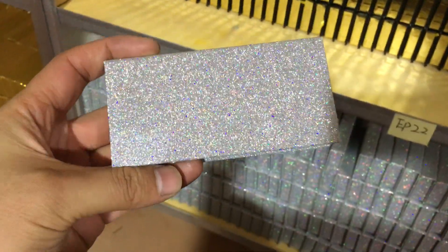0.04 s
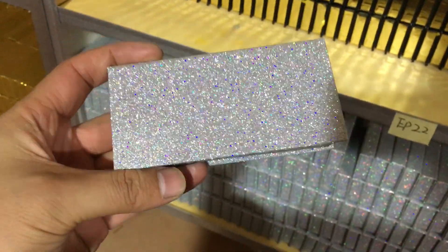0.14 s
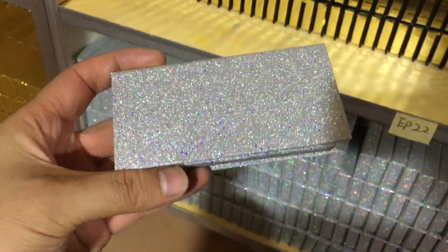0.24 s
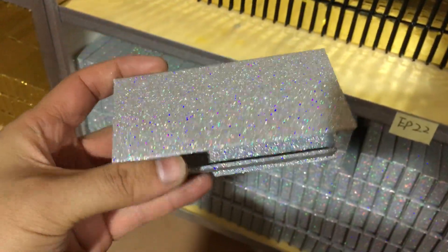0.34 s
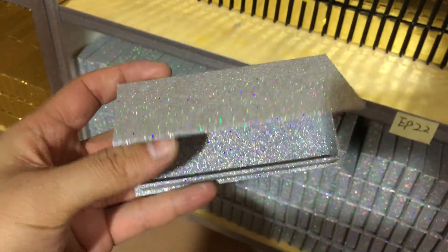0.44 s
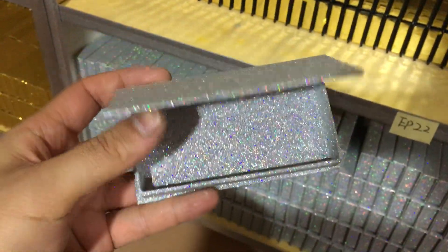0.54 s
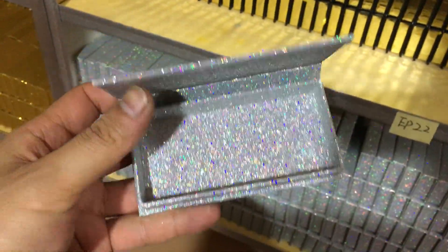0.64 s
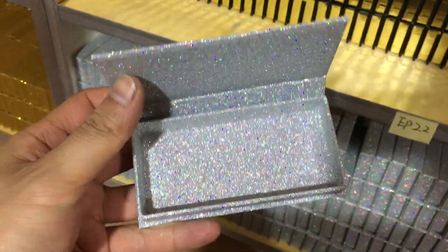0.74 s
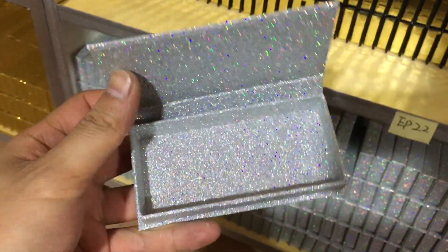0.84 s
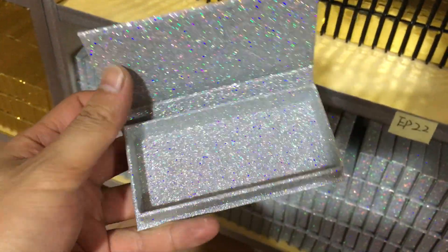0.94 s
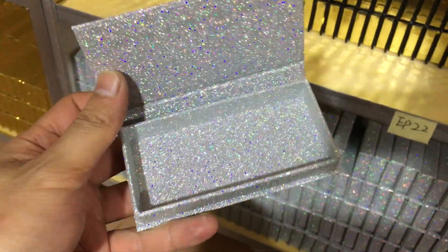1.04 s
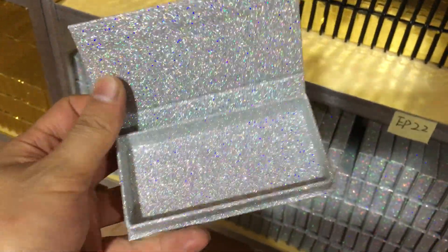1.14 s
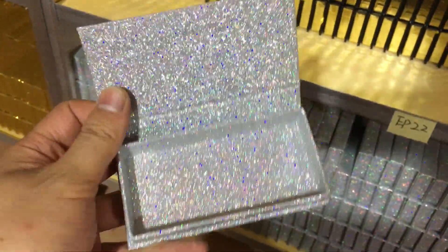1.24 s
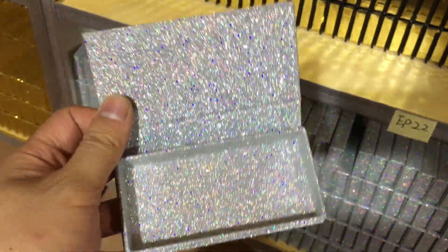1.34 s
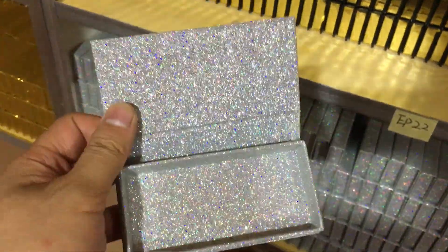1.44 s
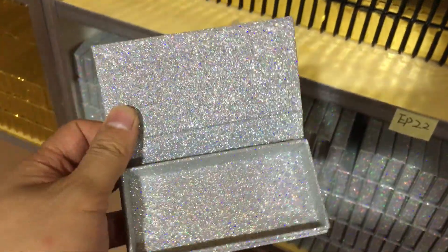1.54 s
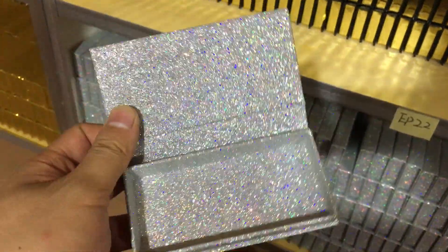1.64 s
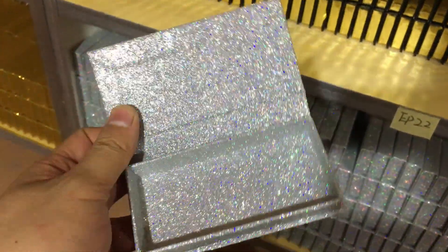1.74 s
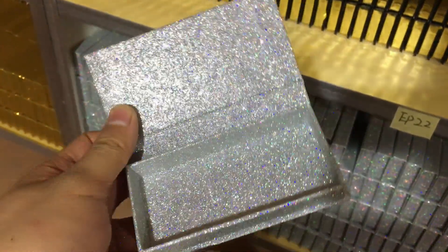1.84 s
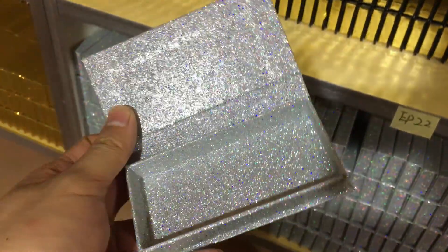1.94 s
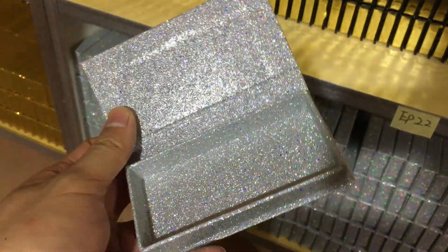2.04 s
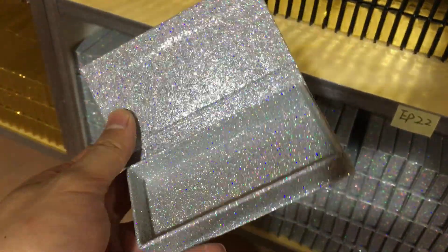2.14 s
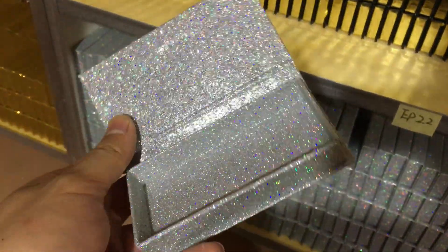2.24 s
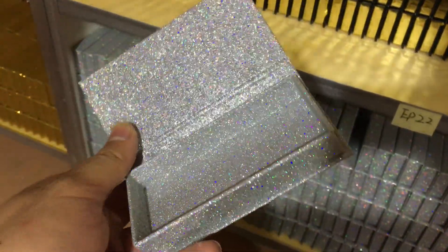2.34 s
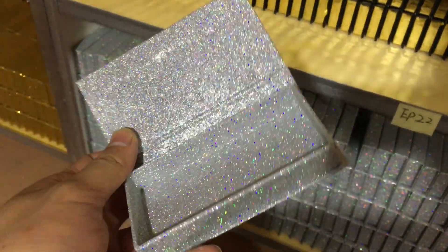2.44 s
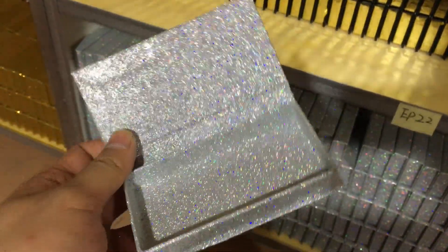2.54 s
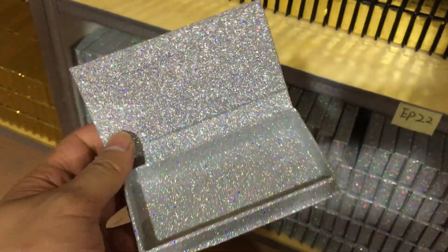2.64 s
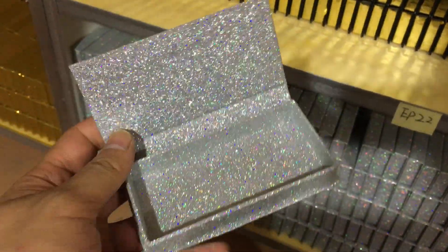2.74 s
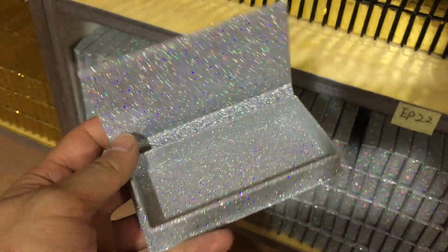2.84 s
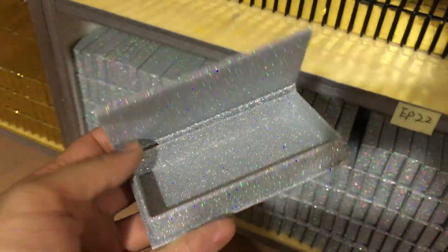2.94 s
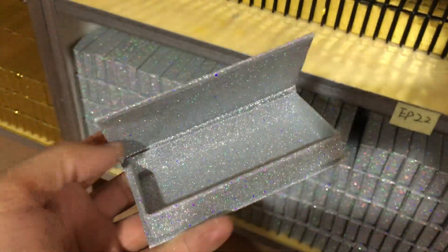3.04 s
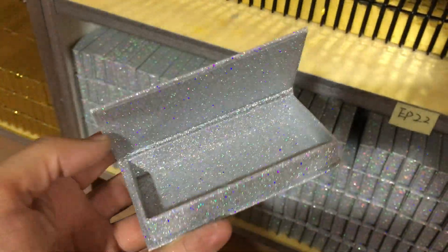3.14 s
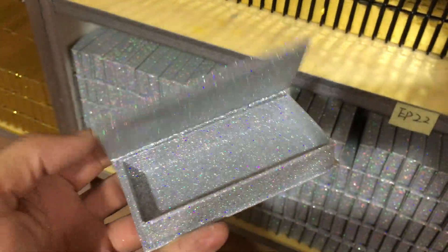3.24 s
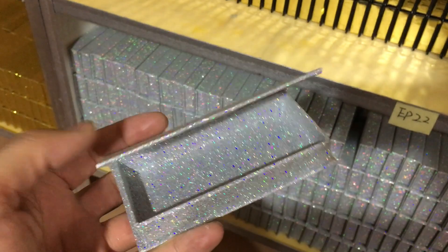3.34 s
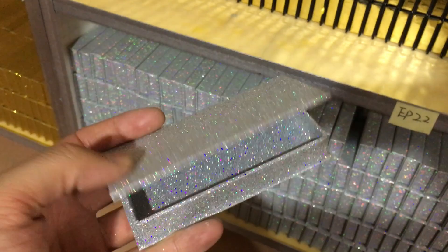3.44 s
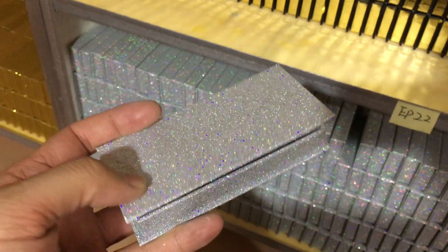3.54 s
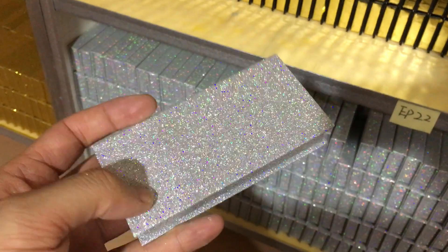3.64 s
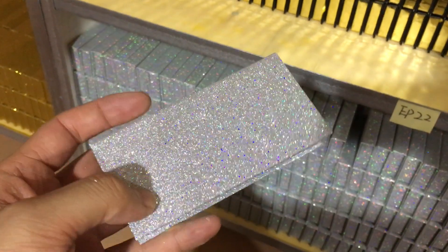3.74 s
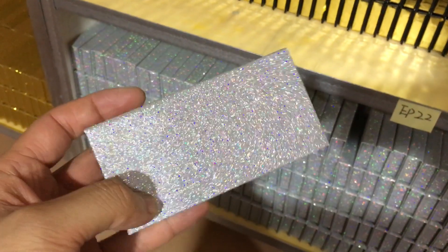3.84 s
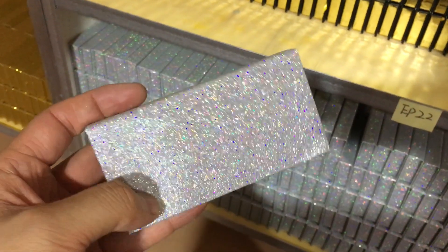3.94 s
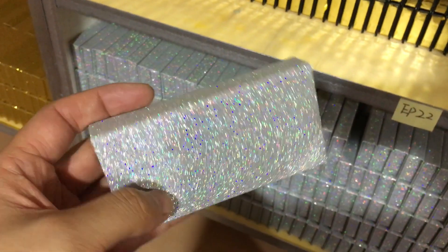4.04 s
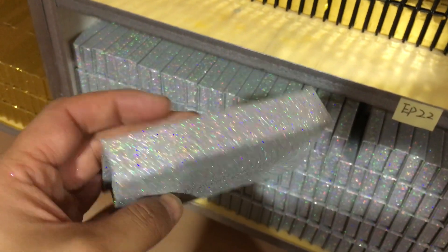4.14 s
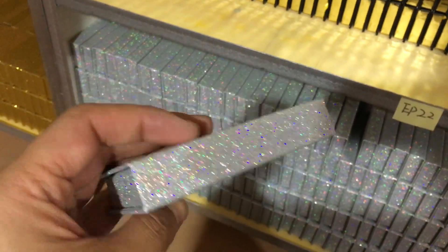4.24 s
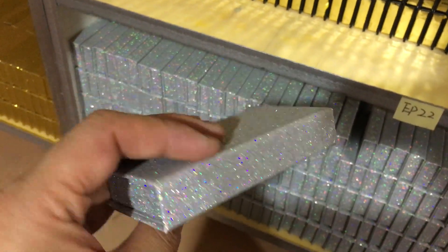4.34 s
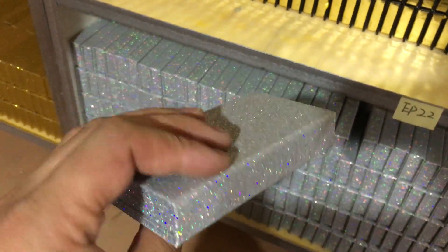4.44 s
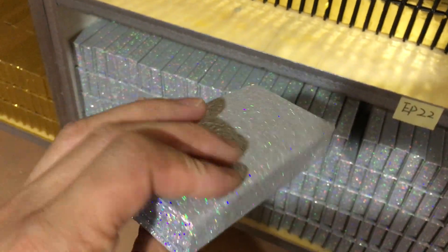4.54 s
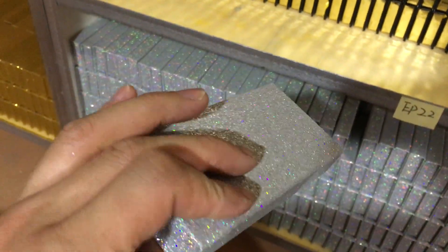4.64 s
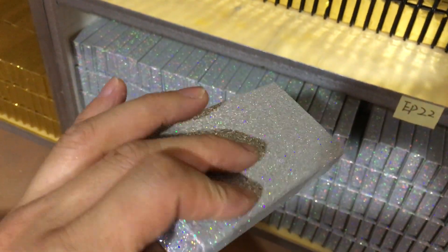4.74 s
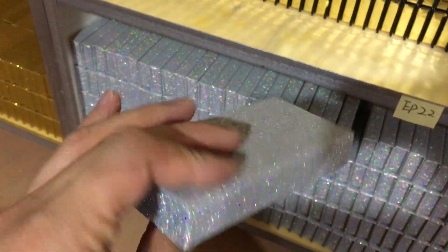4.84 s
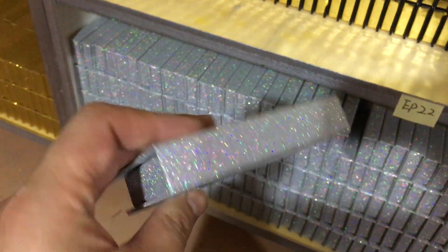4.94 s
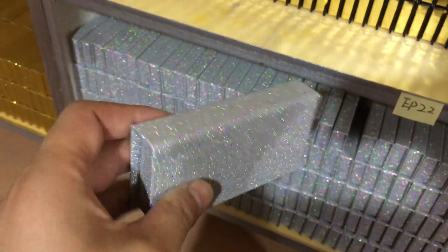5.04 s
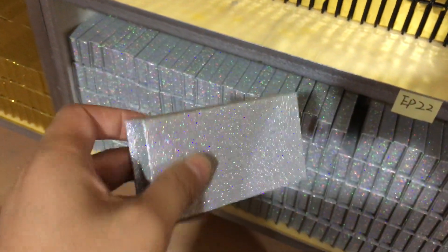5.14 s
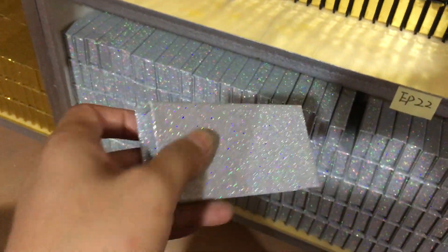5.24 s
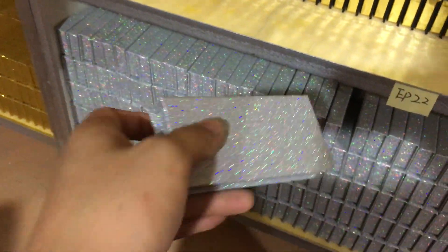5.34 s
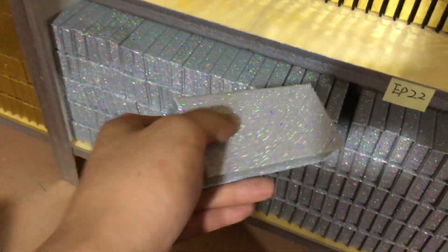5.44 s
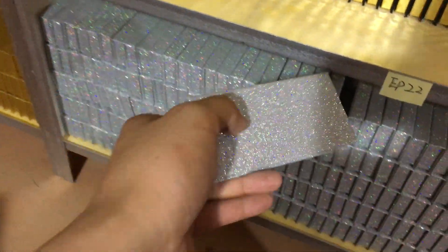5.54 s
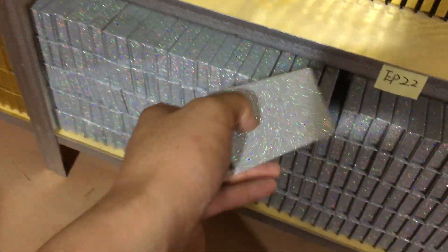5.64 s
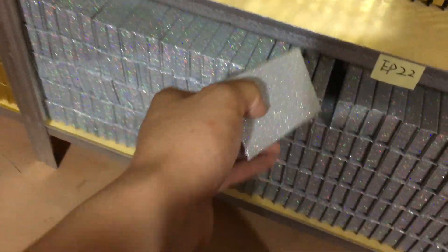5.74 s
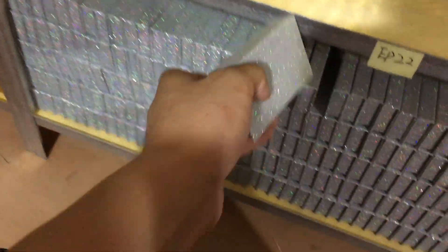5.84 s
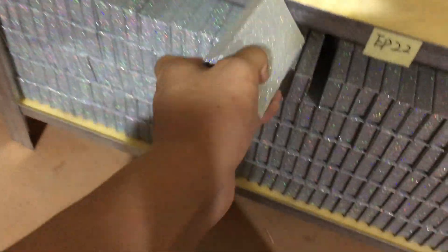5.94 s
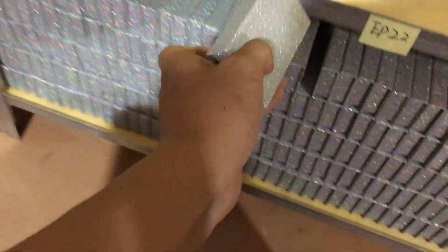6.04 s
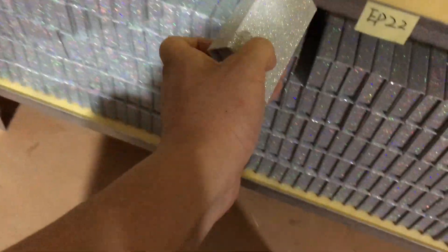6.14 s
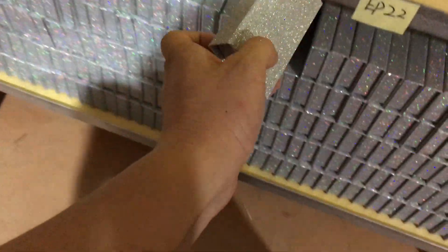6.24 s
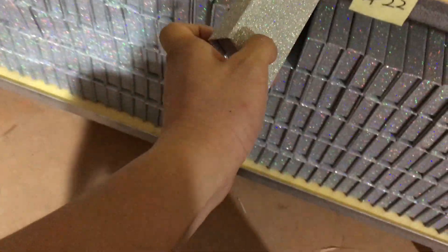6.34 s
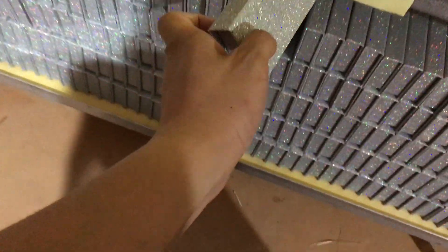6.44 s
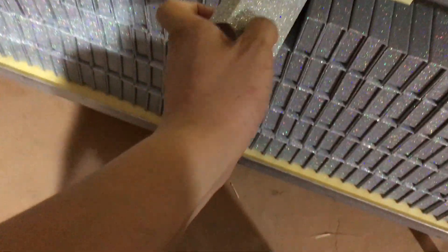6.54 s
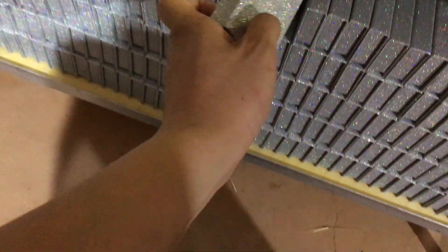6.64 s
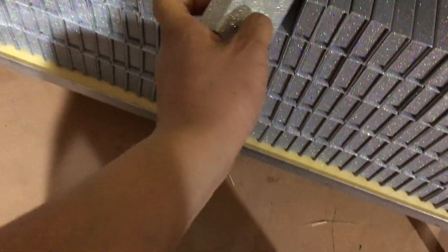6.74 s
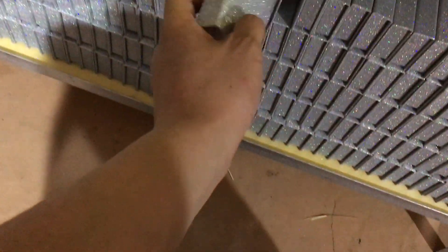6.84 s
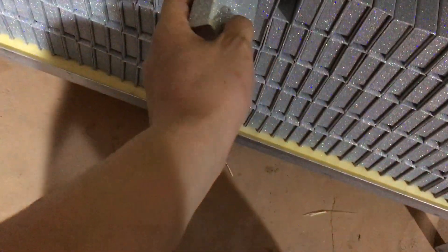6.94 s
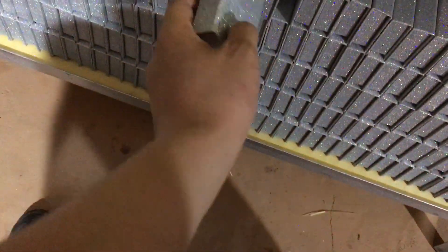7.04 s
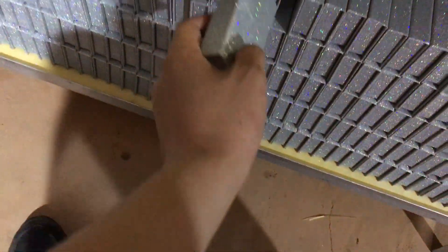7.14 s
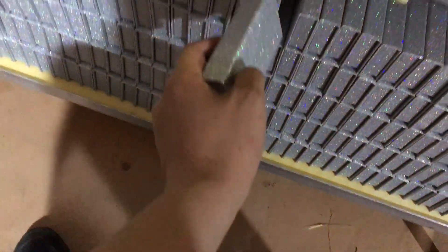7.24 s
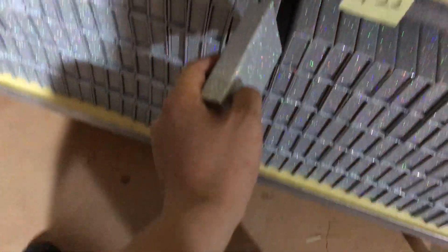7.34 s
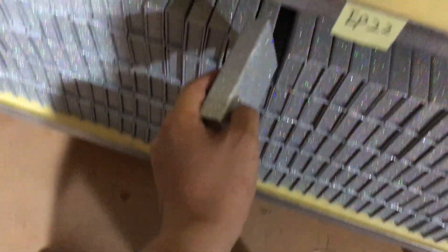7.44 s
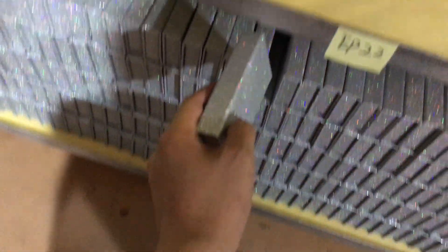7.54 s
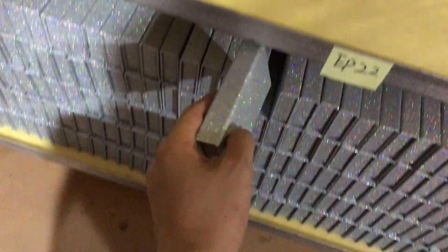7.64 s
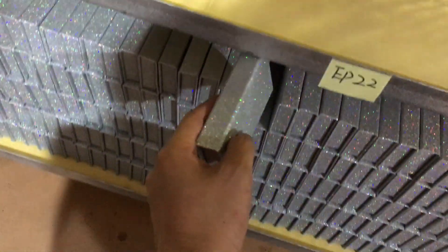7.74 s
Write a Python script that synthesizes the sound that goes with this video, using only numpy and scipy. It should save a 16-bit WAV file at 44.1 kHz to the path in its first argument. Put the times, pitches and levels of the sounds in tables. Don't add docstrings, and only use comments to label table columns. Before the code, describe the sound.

A phone sits close to a small glitter-coated cardboard box in a large warehouse, with faint air hiss and a soft low hum throughout. From about 0.3 to 1.3 seconds, fingers open it with short, dry, gritty rubs, tiny ticks and hollow card sounds. It is nearly quiet until 2.1, apart from a few small clicks, then light scraping resumes as the box is tilted, with a flick at 3.3. At 3.7 the lid snaps shut, crisp, hollow and by far the loudest event. From 3.8 to 5.3, scratchy rubs and clusters of clicks accompany turning it over. Around 5.4, distant tape stutters ever faster, tearing in reverberant cracks from 5.6, strongest at 6.3, 6.5 and 6.7. Dull box bumps mingle with them from 6.0, notably at 6.6. A bright, rough scrape comes at 6.8 to 6.9, then soft rubbing from 7.2 fades into the rumble.

```python
import sys
import numpy as np
from scipy import signal
from scipy.io import wavfile

SR = 44100
rng = np.random.default_rng(int(sys.argv[2]) if len(sys.argv) > 2 else 0)


def elevation(decibels):
    levels = np.asarray(decibels, float)
    return 10 ** (levels / 20)


def put_to_file(sound):
    columns = np.atleast_2d(sound).T
    safe = np.clip(columns, -1, 1)
    whole_steps = np.round(safe * 32767)
    wavfile.write(sys.argv[1], SR, whole_steps.astype(np.int16))


N = 343539

# pitch_hz, level_db
BODY_SPECTRUM = [(250, -29.5), (500, -4.5), (900, -2), (2100, -4), (2500, -9), (3000, -24), (5000, -29)]
GRIT_SPECTRUM = [(1500, -41.5), (2700, 2.5), (3200, 3.5), (3800, 0), (5500, -3), (7000, -10), (11000, -49)]
FIZZ_SPECTRUM = [(4000, -38.5), (6200, 2.5), (7800, -3.5), (9000, -2.5), (10500, -13), (12000, -22),
                 (14500, -25), (16300, -28)]
BOOM_SPECTRUM = [(70, -22), (140, 1.5), (250, 5), (450, -11), (900, -43)]
SHEEN_SPECTRUM = [(8000, -11.5), (11000, -5.5), (13000, -15.5), (16000, -3.5)]
# start_s, length_s, body_db, grit_re_body_db, pitch_hz
OPENING_STROKES = [(0.341, 0.017, -59, -8.5, 1420), (0.385, 0.025, -59.5, -9.5, 1580),
                   (0.432, 0.02, -58.5, -9, 1300), (0.443, 0.058, -53.5, -7.5, 1320),
                   (0.499, 0.063, -56.5, -17, 1680), (0.742, 0.077, -57, -2, 1550),
                   (0.813, 0.041, -57.5, -5.5, 1150), (0.888, 0.031, -69, 4.5, 1220),
                   (0.938, 0.039, -60, -8.5, 1730), (1.003, 0.019, -57, -7, 1650),
                   (1.026, 0.061, -61, -1.5, 1680), (1.086, 0.03, -47.5, -6, 2200),
                   (1.135, 0.04, -65, -4, 600), (1.156, 0.054, -65.5, 5, 1770),
                   (1.24, 0.035, -56.5, -5, 1580)]
# start_s, length_s, body_db, grit_re_body_db, pitch_hz
TILTING_STROKES = [(2.098, 0.16, -69.5, -6, 610), (2.281, 0.015, -73, 0.5, 1340),
                   (2.303, 0.046, -64, -5, 1080), (2.378, 0.03, -69, -4, 1530),
                   (2.424, 0.029, -64, -6, 1640), (2.591, 0.038, -58, -14, 1590),
                   (2.623, 0.1, -53, -8.5, 2230), (2.687, 0.11, -56.5, -10.5, 1600),
                   (2.75, 0.24, -60.5, -31, 1560), (2.876, 0.11, -60, -10, 1640),
                   (2.913, 0.06, -56.5, -6, 1500), (2.949, 0.044, -55, -6.5, 960),
                   (3.03, 0.079, -55.5, -20, 1150), (3.04, 0.04, -57, -22, 620),
                   (3.052, 0.21, -63.5, -15.5, 1140), (3.195, 0.019, -67, -6.5, 1200),
                   (3.3, 0.025, -64, -12, 1100), (3.322, 0.023, -49, -9, 990),
                   (3.463, 0.33, -69, -7.5, 1540)]
# start_s, length_s, body_db, grit_re_body_db, pitch_hz
TURNING_STROKES = [(3.847, 0.11, -57, -4, 2060), (3.916, 0.086, -58.5, -9, 830),
                   (4.059, 0.028, -52, -15.5, 900), (4.079, 0.09, -52, -11.5, 900),
                   (4.139, 0.081, -47, -13.5, 900), (4.215, 0.015, -53, -8, 720),
                   (4.228, 0.064, -62, -4.5, 895), (4.382, 0.15, -66.5, -8, 920),
                   (4.474, 0.017, -66, -1, 1860), (4.527, 0.036, -47.5, -8, 1000),
                   (4.556, 0.035, -55, -3, 1114), (4.64, 0.045, -56, -6, 900), (4.67, 0.079, -63, 1, 1000),
                   (4.9, 0.23, -71, -2, 810), (5.065, 0.095, -65.5, -2, 1000), (5.186, 0.065, -52, -3, 960),
                   (5.25, 0.04, -57, -5, 950), (5.278, 0.075, -51.5, -7.5, 900),
                   (6.803, 0.075, -37.5, -10.5, 734), (6.861, 0.025, -44, -3.5, 810),
                   (6.873, 0.029, -40, -24, 1100), (6.903, 0.021, -35.5, -8.5, 860),
                   (6.927, 0.099, -66, 0, 675), (7.298, 0.062, -55, -10.5, 900),
                   (7.232, 0.55, -62, -8, 1050), (7.362, 0.4, -71, -10, 1900)]
# start_s,
# drag_db, panel_pitch_hz
GRIP_SHIFTS = [(0.0, -88, 4400), (0.37, -79, 3500), (0.54, -66, 3480), (0.89, -69, 4450),
               (1.15, -74.5, 3760), (1.91, -85, 4170), (2.47, -70.5, 4000), (2.71, -76, 3100),
               (2.95, -67, 4380), (3.15, -66.5, 3330), (3.54, -91, 3900), (3.73, -80.5, 3600),
               (4.08, -100, 3880), (5.44, -66, 4200), (5.63, -60, 3500), (6.45, -69, 4100),
               (6.76, -57.5, 3500), (7.0, -70.5, 4090)]
# resting_level_db, gain_db_per_drag_db
DRAG_LAW = [
    (-72.5, 1.05),
    (-76.5, 1.05),
    (-80.5, 0.75),
    (-71, 0.24),
    (-98, -0.5),
]
# level_re_body_db, gain_db_per_grit_db
STROKE_LAW = [
    (-2, 0),
    (-1.5, 1),
    (-3.5, 1.38),
    (-13.5, 0),
    (-13, 1.5),
]
# start_s, peak_db, pitch_hz, treble_re_peak_db
GRIT_CATCHES = [(0.427, -45, 1670, -8), (0.815, -42, 1170, -30), (1.003, -54, 1670, -19),
                (1.719, -44.5, 1680, -4.5), (1.828, -61, 715, -17), (1.867, -59, 646, -16),
                (1.898, -63, 1600, -6), (1.971, -59, 627, -15), (2.118, -55, 600, -18),
                (2.182, -60.5, 1100, -20), (3.034, -56, 1180, -21), (3.325, -44, 2580, -8),
                (3.481, -51, 1570, -18), (4.066, -37, 845, -37), (4.083, -33, 865, -40),
                (4.093, -38, 900, -30), (4.122, -40, 934, -29), (4.159, -44, 1010, -32),
                (4.171, -31, 900, -41), (4.185, -44, 920, -24), (4.198, -37, 1020, -23),
                (4.218, -35, 680, -29), (4.365, -46, 940, -7), (4.396, -52, 980, -6), (4.427, -48, 850, -8),
                (4.522, -47, 915, -6), (4.547, -35, 1790, -5), (4.659, -44, 910, -21)]
# start_s, peak_db, pitch_hz
GRAIN_PRICKS = [(0.398, -58, 6890), (0.5137, -50, 9310), (0.576, -51, 6740), (0.6747, -49, 6280),
                (0.722, -48, 6000), (1.2114, -49, 7120), (1.3743, -52, 8990), (2.2834, -49, 5210),
                (2.4019, -53, 12800), (2.4254, -56, 5080), (2.4458, -60, 5250), (3.0355, -52, 5000),
                (4.2942, -44.5, 6200), (4.548, -43, 13500), (5.082, -52, 6000), (5.113, -48, 6040),
                (7.0957, -51, 10500)]
# start_s,
# peak_db, pitch_hz, t60_s
SHORT_RINGS = [(3.482, -63, 3370, 0.014), (3.481, -60, 4460, .01), (3.481, -60.5, 6600, .015),
               (3.482, -60, 2520, 0.013), (4.365, -52, 3800, 0.013), (4.365, -60, 5130, .012),
               (4.365, -56, 6500, .012), (4.365, -58, 7400, 0.009), (2.93, -67, 4500, .2),
               (2.955, -51.5, 4400, 0.13), (6.813, -48, 3500, .04), (6.8205, -46, 13060, .006),
               (6.823, -39, 5470, .04), (6.824, -46, 11500, .015), (6.828, -44, 3400, .06),
               (6.8337, -35.5, 5000, 0.058), (6.8375, -39, 13500, .008), (6.842, -44, 11100, .012),
               (6.864, -48, 3500, 0.049), (6.869, -36, 4840, 0.049), (6.869, -41, 11700, 0.018),
               (6.877, -44, 11100, 0.027), (6.885, -42, 9300, 0.026), (6.9003, -38, 9200, .012),
               (6.9005, -52, 12500, 0.0087), (6.9054, -29, 4600, 0.047), (6.908, -32, 3440, .04),
               (6.914, -35.5, 1960, 0.034),
               (3.324, -43.5, 3800, .03), (3.334, -40, 2700, 0.045), (3.333, -44, 3900, 0.037),
                (3.339, -50.5, 9300, 0.022), (4.108, -46, 990, .025), (4.135, -43, 890, .025),
                (4.1765, -35.5, 1000, .015), (4.088, -56, 1900, .04), (4.15, -54, 2100, .15),
                (3.733, -41, 800, .015), (3.696, -57, 3000, .05), (4.428, -61, 4500, 0.009),
                (5.5, -41, 1850, .05), (6.095, -53, 1660, 0.027), (6.141, -42, 1930, 0.13),
                (6.142, -51.5, 3020, .03), (5.5, -50, 1470, 0.058), (6.607, -40.5, 196, 0.073),
                (0.4585, -50.5, 2150, 0.071), (0.514, -54, 3500, .02), (0.66, -63, 4200, .08),
                (1.096, -45, 3900, .02), (1.092, -53, 1500, .04), (0.345, -54, 1360, .04),
                (0.386, -49, 1550, .03), (0.44, -52, 1620, .02), (3.055, -53, 1170, .05),
                (1.165, -50, 4100, .04), (1.245, -50.5, 3900, 0.054), (6.287, -31.5, 2920, 0.036),
                (0.55, -60, 2500, .13)]
# start_s, peak_db
LID_SNAP = [
    (3.704, -9.5),
]
# pitch_hz, level_db, t60_s
LID_MODES = [(272, -11, 0.037), (715, 7, 0.016), (900, 4.5, 0.018), (1070, -11, 0.05), (1340, -10.5, 0.013),
             (1680, -0.5, 0.023), (2364, -8.5, 0.017), (2910, 2.5, 0.011), (3500, -7, 0.015),
             (8500, -17, 0.006), (420, -10, 0.025), (2260, -8, 0.013)]
# pitch_hz, level_db_per_hz
CLAP_SPECTRUM = [(88, -40), (190, -13.5), (494, -10), (790, 1.5), (1720, -7), (2650, -14.5), (3490, -14),
                 (4160, -22), (6260, -24.5), (16000, -56)]
# start_s, peak_db, pitch_hz, t60_s
BOX_BUMPS = [(0.818, -53, 374, 0.061), (0.835, -55, 330, 0.066), (1.121, -48, 260, 0.16),
             (2.302, -61, 299, 0.09), (2.955, -51, 180, 0.092), (3.323, -48, 420, 0.086),
             (4.14, -50, 390, 0.19), (5.115, -53, 230, 0.06), (5.242, -40.5, 254, 0.019),
             (6.042, -38, 673, 0.049), (6.093, -39.5, 646, 0.023), (6.139, -38, 620, 0.06),
             (6.249, -40.5, 580, 0.06), (6.606, -25.5, 395, 0.053), (6.627, -35, 316, 0.087),
             (6.822, -39.5, 180, 0.23), (6.881, -36, 174, 0.18), (6.91, -33.5, 504, 0.091),
             (7.299, -50.5, 580, 0.41), (7.5, -58, 650, 0.6)]
# start_s, peak_db, treble_re_peak_db, room_re_peak_db
TAPE_TEARS = [
    (5.61, -35, -15, 4),
    (5.633, -32, -27, 0.5),
    (5.671, -28, -27, 1),
    (5.782, -25, -11, 0.5),
    (5.831, -24.5, -44, 0.5),
    (5.918, -20.5, -10, 1),
    (5.952, -51, -33, -1),
    (6.285, -17.5, -9, 1),
    (6.488, -17.5, -7.5, 0.5),
    (6.676, -18, -7.5, -1),
]
# pitch_hz, width_hz, level_db
CARTON_MODES = [(738, 31, -12), (953, 23, -8), (1200, 70, -5), (1330, 60, 3), (1550, 70, -3),
                (1780, 70, -2), (1980, 33, -1), (2290, 90, -3), (2430, 120, 0), (2760, 93, -13),
                (3150, 48, -14), (3640, 40, -14), (4140, 59, -14), (5460, 68, -18)]
# pitch_hz, level_db_per_hz
TEAR_SPECTRUM = [(150, -23), (300, -15), (600, -15.5), (1000, -5.5), (1350, 0), (2000, -3.5), (2500, -7.5),
                 (2800, -10.5), (4500, -18.5), (6500, -13.5), (7600, -30.5), (9000, -27.5), (16000, -53.5)]
# pitch_hz, level_db
CREEP_SPECTRUM = [(300, -8), (620, -14), (850, -14), (1300, 1), (2000, 2), (2450, 1.5), (2650, -11),
                  (3600, -14)]
# pitch_hz, t60_s
HALL_DECAY = [(250, 0.54), (660, 0.28), (1740, 0.36), (4590, 0.33), (12000, 0.2)]
# pitch_hz, level_db_per_hz
AIR_SPECTRUM = [(12, -41), (20, -11), (65, 1), (172, -25.5), (204, -27.5), (337, -26), (434, -41),
                (485, -34), (1120, -35.5), (1260, -31), (1440, -51), (1860, -36.5), (2820, -39),
                (11400, -49), (16000, -53)]
# start_s, fan_hum_db, deep_rumble_db
RUMBLE_LEVELS = [(0.0, -67.5, -65), (1.5, -60.5, -67), (1.69, -58, -59), (1.85, -64, -66.5),
                 (2.84, -62.5, -64.5), (3.06, -68, -67), (5.0, -67.5, -69), (6.01, -69.5, -73),
                 (6.182, -66, -63), (7.79, -61, -71)]
# pitch_hz, level_db
PORT_RESPONSE = [(15, -29.5), (36, 1), (7000, -0.5), (7700, -1), (8400, 0.5), (10000, 1), (10600, 0.5),
                 (11200, 5), (15900, 1), (16600, -46.5)]


def evened(x):
    return x / np.sqrt(np.mean(x ** 2) + 1e-20)


def peaked(x):
    return x / np.max(abs(x))


def read(points, hz):
    f, value = np.transpose(points)
    return np.interp(np.log(hz + 1), np.log(f + 1), value)


def add(mix, s, sound):
    part = mix[round(s * SR):][:len(sound)]
    part += sound[:len(part)]


def colour(x, points, size=4096):
    hz = abs(np.fft.fftfreq(size, 1 / SR))
    log_gain = np.log(elevation(np.maximum(read(points, hz), -100)))
    taps = np.fft.ifft(np.exp(np.conj(signal.hilbert(log_gain)))).real
    return signal.oaconvolve(x, taps[:size // 2])[:len(x)]


def resonate(x, hz, width):
    turn = np.exp(2j * np.pi * np.cumsum(hz * np.ones(len(x))) / SR)
    r = np.exp(-np.pi * width / SR)
    return 2 * (turn * signal.lfilter([1 - r], [1, -r], x / turn + 1e-18)).real


def grains(per_s, spread_db):
    size = elevation(spread_db * np.minimum(rng.exponential(1, N), 4)) * rng.choice([-1., 1.], N)
    return evened(size * (rng.random(N) < per_s / SR))


def judder(width_hz, depth_db):
    return elevation(depth_db * np.clip(evened(resonate(rng.standard_normal(N), 0, width_hz)), -2, 2))


def wander(width_hz):
    slow = resonate(resonate(rng.standard_normal(N), 0, width_hz), 0, width_hz)
    return 1 + 0.073 * evened(slow)


def strokes():
    t = np.arange(N) / SR
    s, drag_db, panel_hz = np.transpose(GRIP_SHIFTS)
    drag_db = np.interp(t, s, drag_db) + 72
    panel_hz = np.interp(t, s, panel_hz)
    power = np.array([elevation(rest_db + slope * drag_db) ** 2 for rest_db, slope in DRAG_LAW])

    rows = sorted(OPENING_STROKES + TILTING_STROKES + TURNING_STROKES)
    for s, length, body_db, grit_db, hz in rows:
        size = round((length + .014) * SR)
        pressure = signal.windows.tukey(size, .7) ** 2 * np.geomspace(1.5, .6, size)
        for band, (part_db, slope) in zip(power, STROKE_LAW):
            add(band, s - .007, elevation(body_db + part_db + slope * grit_db) ** 2 * pressure)
    power[-1] *= elevation(6.5 * (t > 4.45)) ** 2

    starts, *_, pitches = np.transpose(rows)
    pitch = pitches[np.maximum(np.searchsorted(starts - .004, t) - 1, 0)]
    pitch = pitch * wander(27)
    panel_hz = panel_hz * wander(21)
    drive = grains(7000, 2.45) * judder(42, 1.83)
    stick = judder(133, 0.86)

    hollow = resonate(drive, pitch, 290) + 0.34 * resonate(drive, 2.1 * pitch, 280) + 0.34 * drive
    panels = resonate(drive, panel_hz, 520) + .4 * resonate(drive, 3450, 220)
    panels += .6 * resonate(drive, 5300, 300) + .2 * drive
    fizz = resonate(drive, 6740, 1000) + resonate(drive, 9420, 900) + 1.4 * drive
    parts = [stick * colour(hollow, BODY_SPECTRUM), colour(panels, GRIT_SPECTRUM),
             colour(fizz, FIZZ_SPECTRUM), colour(drive, BOOM_SPECTRUM), colour(drive, SHEEN_SPECTRUM)]
    return sum(np.sqrt(level) * evened(part) for level, part in zip(power, parts))


def ticks():
    out, t = np.zeros(N), np.arange(900) / SR
    crack_spectrum = GRIT_SPECTRUM[:-2] + FIZZ_SPECTRUM[-4:]
    for s, db, hz, treble_db in GRIT_CATCHES:
        noise = rng.standard_normal(len(t))
        catch = noise * elevation(-60 * t / 0.011)
        ring = resonate(catch, hz, 250) + .5 * resonate(catch, 2.05 * hz, 150)
        sharp = peaked(colour(noise * elevation(-60 * t / 0.0047), crack_spectrum))
        add(out, s, elevation(db) * (peaked(colour(ring, BODY_SPECTRUM)) + elevation(treble_db - 1.5) * sharp))
    impulse = 1. * (t == 0)
    for s, db, hz in GRAIN_PRICKS:
        add(out, s, elevation(db) * peaked(resonate(resonate(impulse, hz, 3400), hz, 5600)))
    return out


def plucks():
    out, t = np.zeros(N), np.arange(6000) / SR
    for s, db, hz, t60 in SHORT_RINGS:
        scratch = rng.standard_normal(len(t)) * elevation(-60 * t / t60)
        width = hz / 8.5
        add(out, s, elevation(db) * peaked(resonate(resonate(scratch, hz, width), hz, 2 * width)))
    return out


def snap():
    out, puff, t = np.zeros(N), np.zeros(N), np.arange(4000) / SR
    s, peak_db = LID_SNAP[0]
    ring = np.zeros(len(t))
    for k, (hz, db, t60) in enumerate(LID_MODES):
        ring += (-1) ** k * elevation(db - 60 * t / t60) * np.sin(2 * np.pi * hz * t)
    add(ring, .0008, 0.63 * ring.copy())
    clap = peaked(colour(rng.standard_normal(len(t)) * elevation(-60 * t / 0.019), CLAP_SPECTRUM))
    add(out, s + 0.00059, elevation(peak_db) * peaked(peaked(ring) + 0.6 * clap))
    add(puff, s, elevation(peak_db - 14.5) * peaked(colour(1. * (t == 0), CLAP_SPECTRUM)))
    return out, puff


def bumps():
    out, t = np.zeros(N), np.arange(5000) / SR
    for s, db, hz, t60 in BOX_BUMPS:
        puff = rng.standard_normal(len(t)) * elevation(-60 * t / t60) * (1 - np.exp(-t / .0008))
        dull = [(hz / 3.5, -30), (hz / 1.4, -3), (hz * 1.3, 0), (hz * 3, -12), (hz * 8, -35), (20000, -60)]
        thud = colour(puff, dull)
        add(out, s, elevation(db) * peaked(thud + 1.16 * resonate(thud, hz, hz / 7)))
    return out


def slips():
    count = 13
    k = np.arange(count)
    gaps = np.maximum(.0223 - .0015 * k, .0146)
    jitter = .0006 * rng.standard_normal(count) * (k > 0)
    times = 5.3981 + np.cumsum(gaps) - gaps + jitter
    db = -43.5 + 10 * (k / k[-1]) ** 2 + 6 * (k == 0)
    treble_db = np.where(k == 0, -10, -30 + 15 * k / k[-1])
    return list(zip(times, db, treble_db))


def crack(blow, treble_db):
    return peaked(colour(blow, TEAR_SPECTRUM)) + elevation(treble_db - 4.5) * peaked(colour(blow, FIZZ_SPECTRUM))


def carton():
    dry, wet, t = np.zeros(N), np.zeros(N), np.arange(3000) / SR
    impulse = 1. * (t == 0)
    modes = [elevation(db) * peaked(resonate(impulse, hz, width)) for hz, width, db in CARTON_MODES]
    ring = peaked(sum(modes))
    rise = np.clip(t / 0.00268, 0, 1) ** 2
    wall, wall_lag_s = peaked(resonate(resonate(impulse, 2400, 200), 2400, 500)), .002

    tear = rng.standard_normal(len(t))
    tear_decay = elevation(-60 * t / 0.0041) + 0.17 * elevation(-60 * t / 0.045)
    for s, db, treble_db, room_db in TAPE_TEARS:
        blow = (.6 * tear + rng.standard_normal(len(t))) * tear_decay * rise
        add(dry, s, elevation(db) * (crack(blow, treble_db) + 0.33 * ring))
        add(dry, s + wall_lag_s, elevation(db - 9.0) * wall)
        add(wet, s + .003, elevation(db + room_db) * (crack(impulse, treble_db) + 0.16 * ring))

    shared = rng.standard_normal(len(t))
    knock = peaked(ring * (1 - np.exp(-t / .002)))
    low = CREEP_SPECTRUM + [(6000, -30), (20000, -55)]
    high = FIZZ_SPECTRUM[:2] + [(7400, -20), (16000, -40)]
    for s, db, treble_db in slips():
        creep = (shared + 0.21 * rng.standard_normal(len(t))) * elevation(-60 * t / 0.046) * rise
        push = peaked(colour(creep, low)) + elevation(treble_db) * peaked(colour(creep, high))
        add(dry, s - .002, elevation(db) * (.45 * push + .7 * knock))
        add(dry, s + wall_lag_s, elevation(db - 12) * wall)
        add(wet, s, elevation(db - 2.5) * (.7 * crack(impulse, treble_db) + .6 * ring))
    return dry + hall(wet)


def hall(x):
    taps = np.zeros(SR)
    at = np.arange(150, SR - 8, 8)
    taps[at + rng.integers(0, 8, len(at))] = rng.choice([-1., 1.], len(at))
    hz, t, z = signal.stft(taps, SR, nperseg=256)
    early = elevation(-60 * t / read(HALL_DECAY, hz)[:, None])
    late = elevation(-18.5 - 60 * t / 1.62)
    tail = signal.istft(z * (early + late), SR, nperseg=256)[1]
    tail = tail[:SR] * np.linspace(1, 0, SR)
    return signal.fftconvolve(x, tail / np.linalg.norm(tail))[:N]


def air():
    t = np.arange(N) / SR
    s, hum_db, deep_db = np.transpose(RUMBLE_LEVELS)
    a, b, c = rng.standard_normal((3, N))
    hiss = evened(colour(a, [(60, -110)] + [p for p in AIR_SPECTRUM if p[0] > 95]))
    hum = evened(resonate(resonate(b, 68.35, 5), 72, 24) + 0.31 * resonate(b, 79, 30))
    deep = evened(resonate(resonate(c, 37, 21), 42, 28))
    return elevation(-72.5) * hiss + elevation(np.interp(t, s, hum_db)) * hum + elevation(np.interp(t, s, deep_db)) * deep


def scene():
    near = strokes() + ticks() + bumps()
    shut, puff = snap()
    reverb = hall(elevation(-15.5) * near + puff)
    return (near + plucks() + shut + reverb + carton() + air())[None]


def roll_off(x):
    return signal.sosfilt(signal.butter(12, 16470, fs=SR, output="sos"), x)


def record(dry):
    heard = colour(dry[0], PORT_RESPONSE)[None]
    return roll_off(heard)


dry = scene()
out = record(dry)
put_to_file(out)
```